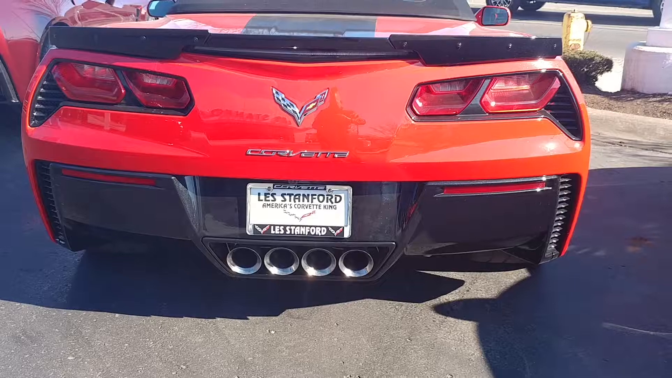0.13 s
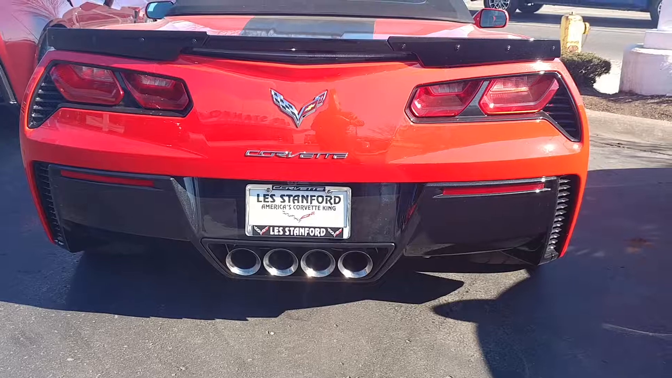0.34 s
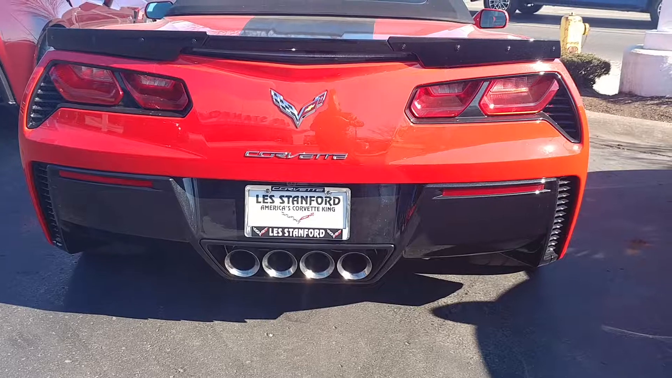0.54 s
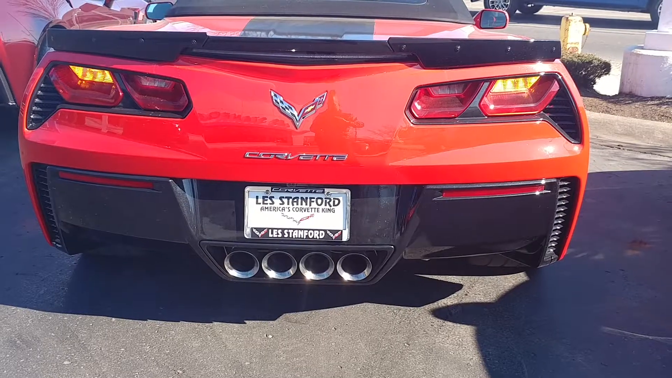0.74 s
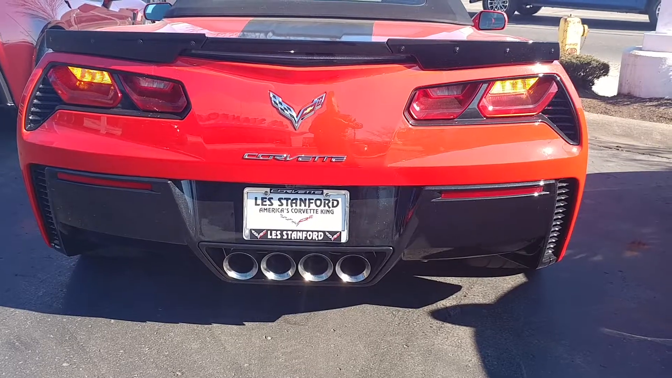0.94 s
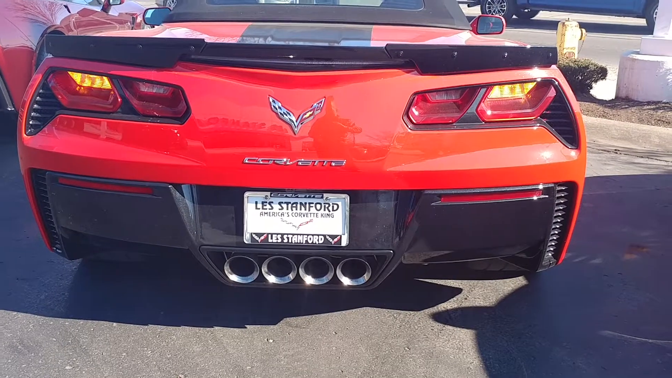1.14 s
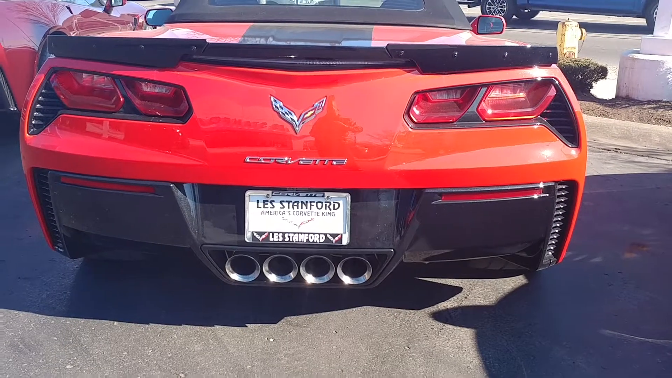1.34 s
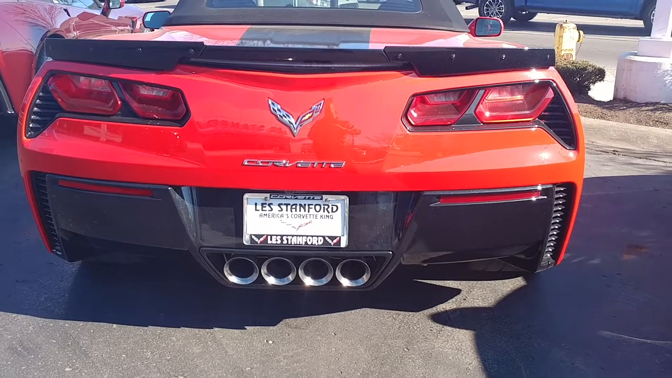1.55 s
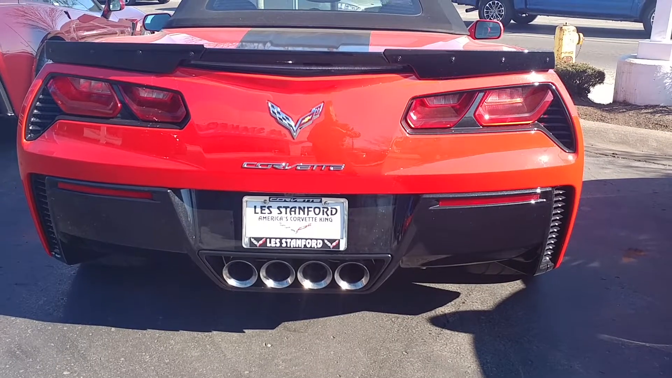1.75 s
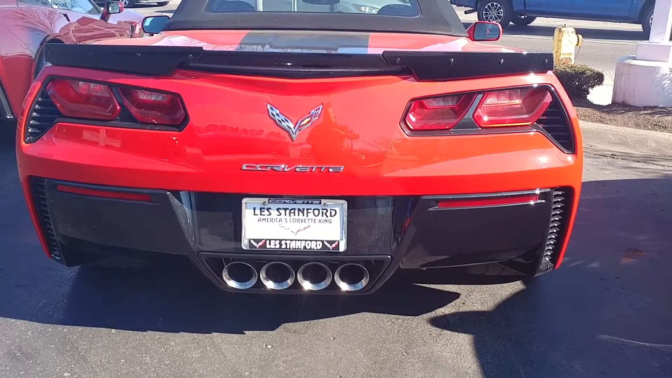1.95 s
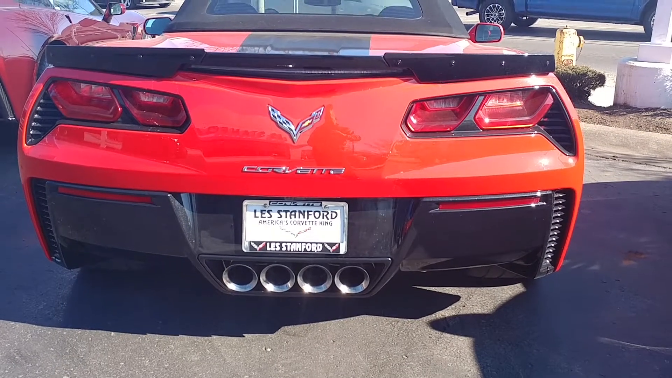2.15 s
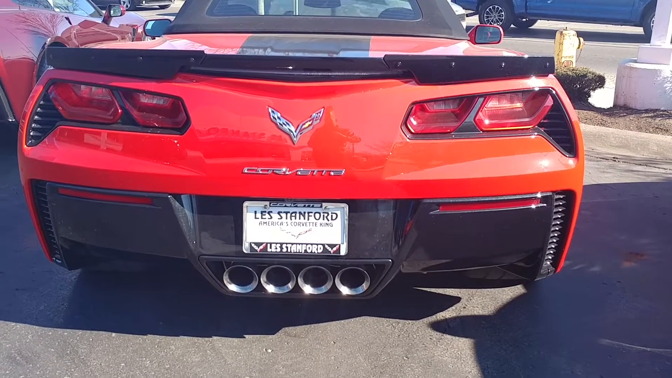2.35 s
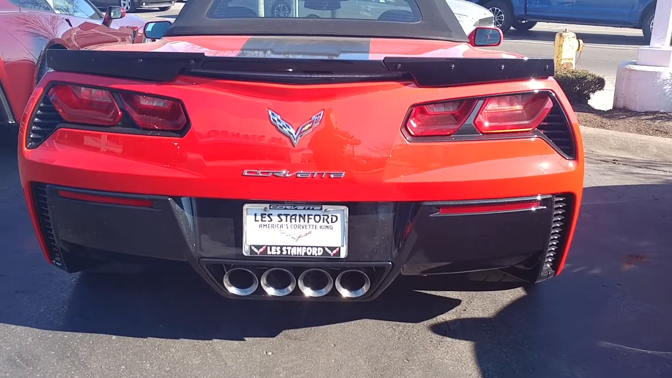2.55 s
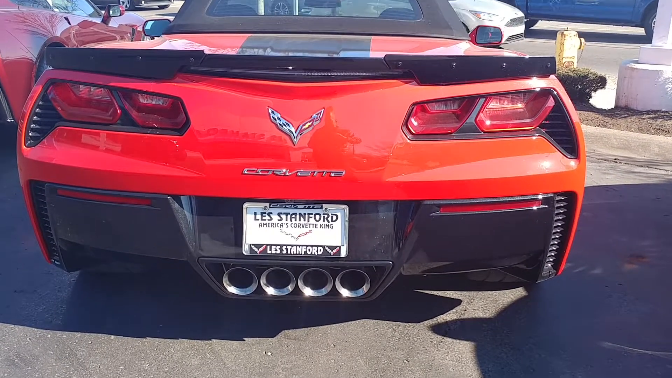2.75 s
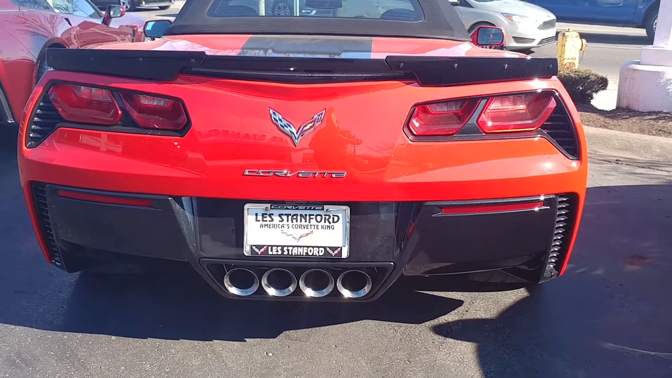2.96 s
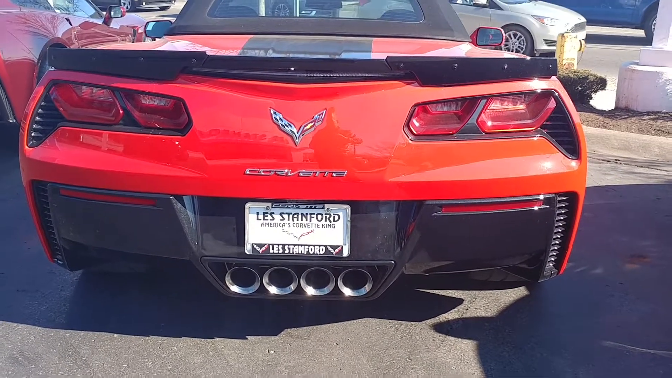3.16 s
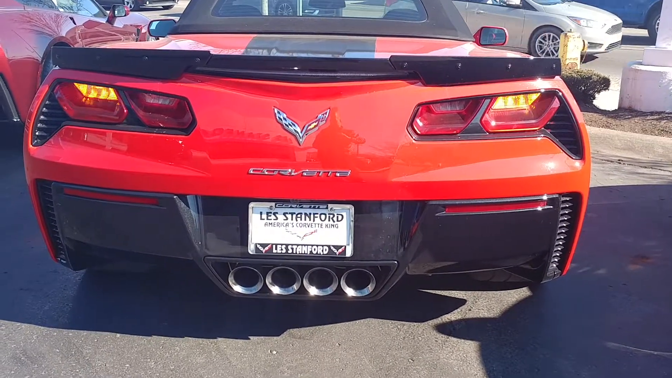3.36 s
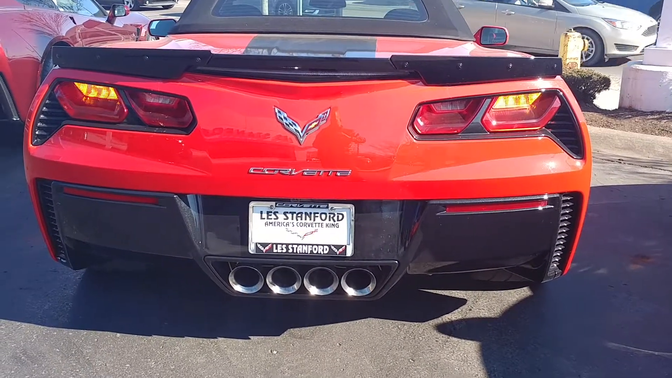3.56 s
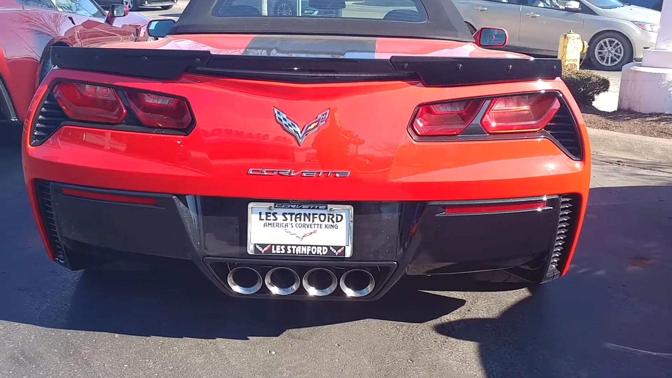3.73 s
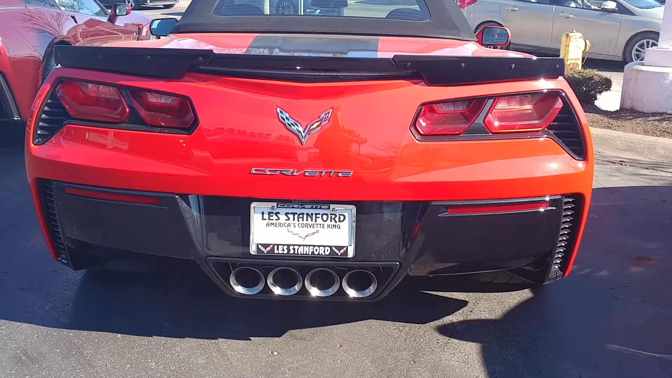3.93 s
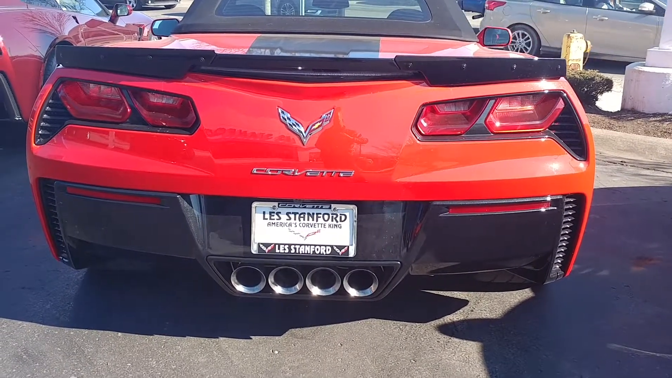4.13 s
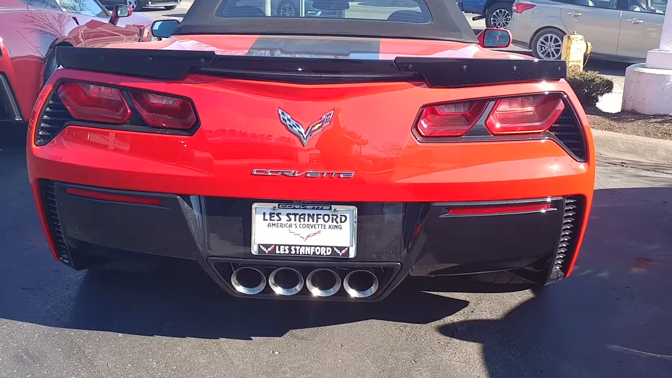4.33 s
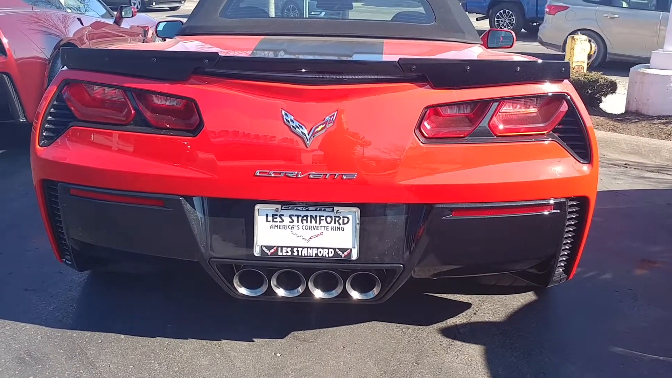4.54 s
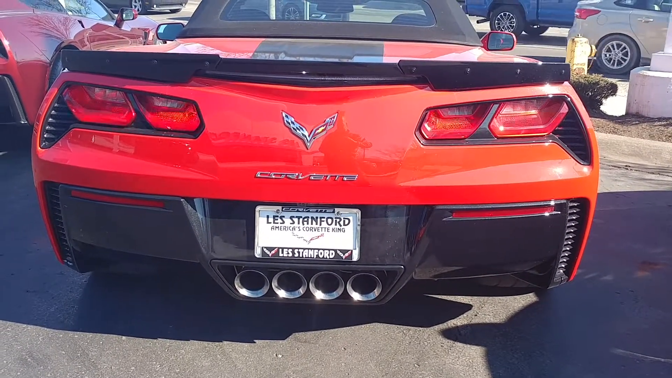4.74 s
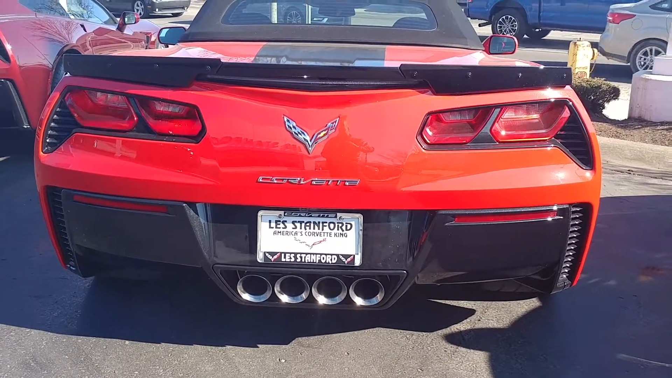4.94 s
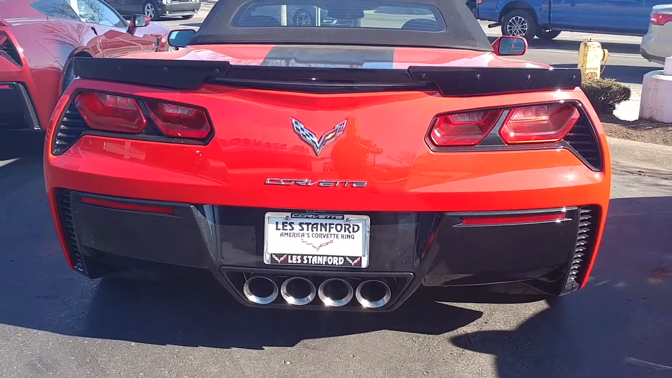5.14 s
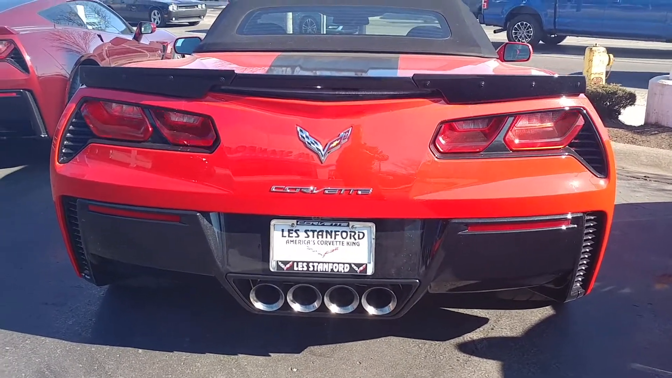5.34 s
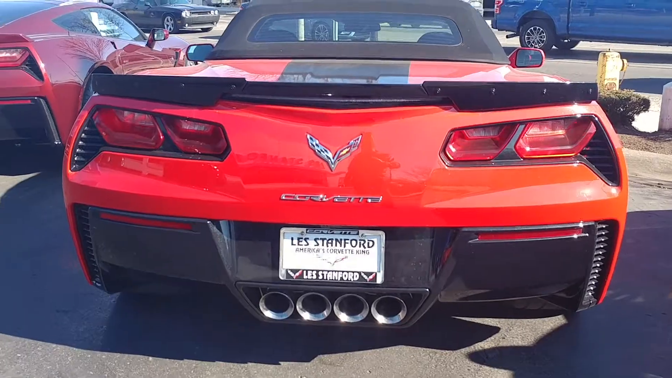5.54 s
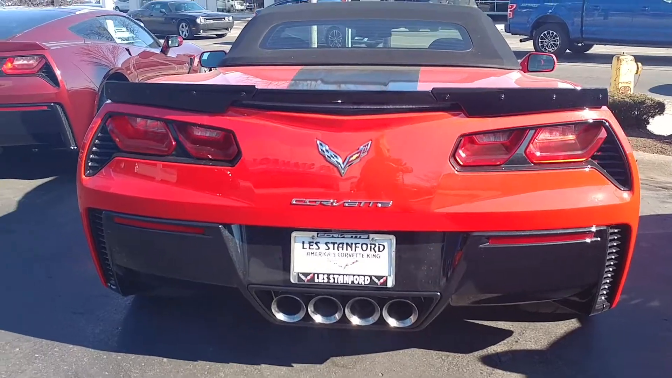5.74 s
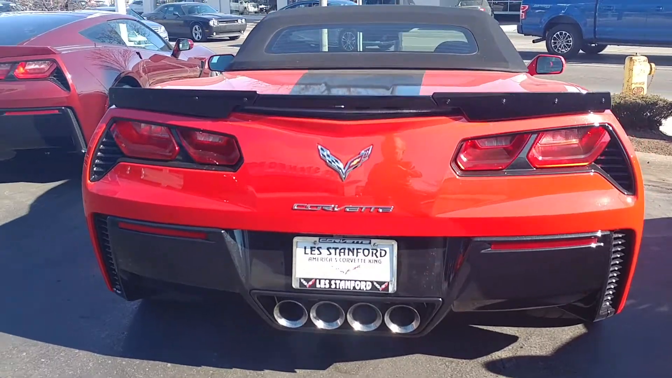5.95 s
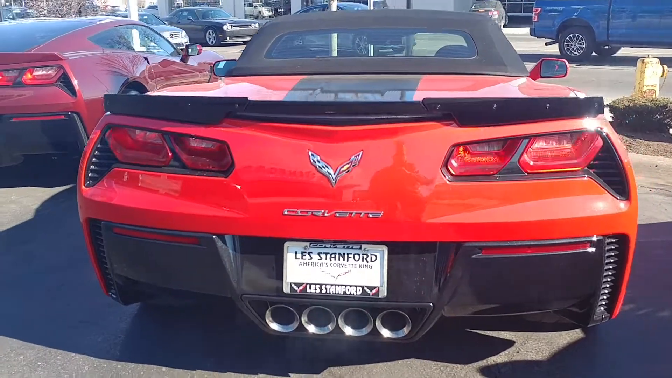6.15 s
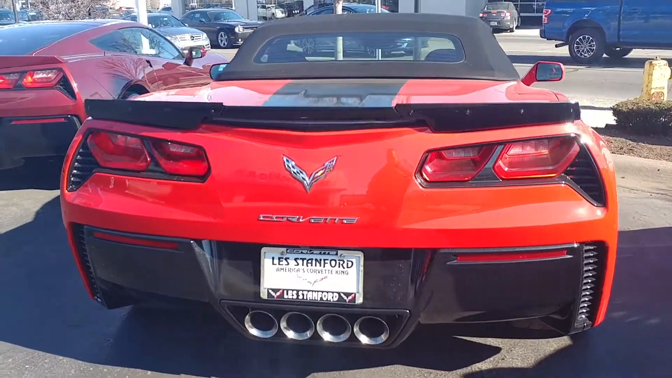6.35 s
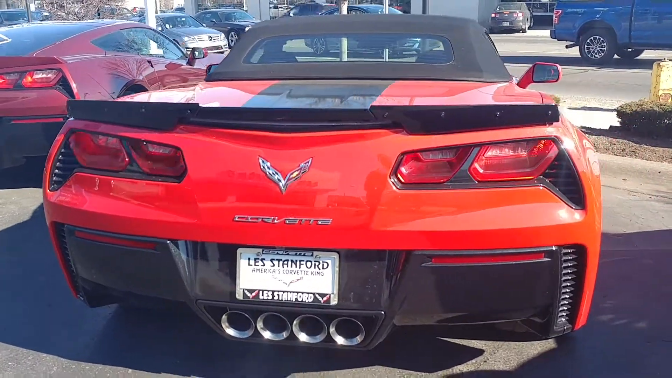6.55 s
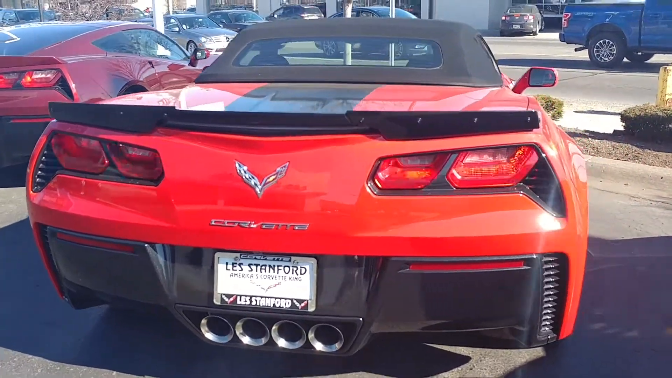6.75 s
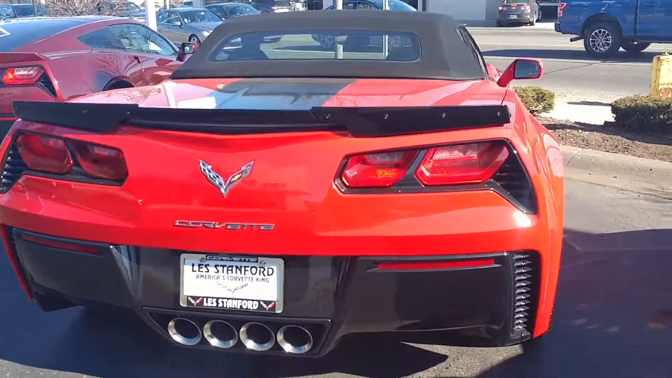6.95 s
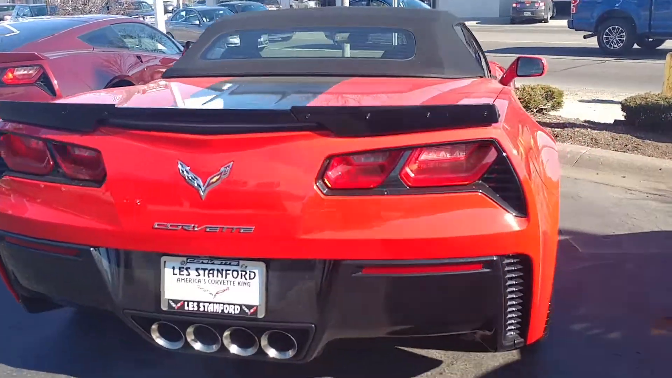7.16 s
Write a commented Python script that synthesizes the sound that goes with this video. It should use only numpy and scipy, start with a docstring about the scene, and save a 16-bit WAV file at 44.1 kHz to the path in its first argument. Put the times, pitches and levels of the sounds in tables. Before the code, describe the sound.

Low traffic rumble and road roar fill an open lot, with faint, even ticking and a few thin wisps of hiss. A plastic remote key clicks twice at about 0.6 and 0.7 seconds and again at 1.7. A dull bump follows at 2.6. Around 3.4 seconds a relay snaps softly and the fuel pump hisses faintly, with another snap and a thud at 3.7. From 3.9 the starter grinds with a wavering, rising whine and two clanks. At 4.5 seconds the big V8 catches with a loud bark, followed by a sharp pop. It holds a fast, loud cold idle, with thumping pulses, a booming muffler, ringing pipes and puffs of hiss, easing slightly in speed until the end at about 7.2 seconds. The microphone is just behind the tail pipes and overloads on the peaks.

```python
"""A big eight-cylinder engine starts by remote key in an open lot, heard from just behind its tail pipes.
Over rumbling traffic the key clicks, relays snap, the fuel pump primes and the starter grinds and whines
against the compressions. The engine catches with a bark and holds a fast, loud cold idle: each firing
thumps, rings the muffler and pipes and puffs out hiss. The peaks overload a two-port microphone."""
import sys
import numpy as np
from scipy import signal
from scipy.fft import rfft, irfft, next_fast_len
from scipy.io import wavfile
from scipy.ndimage import uniform_filter1d

SR = 44100
rng = np.random.default_rng(int(sys.argv[2]) if len(sys.argv) > 2 else 0)


def bounce(signal):
    """Save signal as a 16-bit WAV file at the path given by the first command-line argument."""
    frames = np.transpose(np.atleast_2d(signal))
    limited = np.clip(frames, -1, 1)
    pcm = np.round(limited * 32767).astype(np.int16)
    wavfile.write(sys.argv[1], SR, pcm)


N = 317079
T = np.arange(N) / SR
CATCH_S, CYCLE_S = 4.527, 4.5374  # the engine catches; its first firing cycle starts

# engine speed: time_s, firing_rate_hz
FIRING_RATE = [(4.53, 43.5), (4.58, 58.7), (4.7, 91.5), (5.1, 91.), (5.4, 88.9), (6.1, 88.6), (6.3, 84.7),
               (6.85, 82.6), (7.19, 82.6)]
# how alike the two ports hear the car: freq_hz, correlation
NEAR_CORRELATION = [(60, 0.96), (180, 0.97), (550, 1), (1650, -0.22), (4970, -0.18), (15000, -0.15)]


def amp(db):
    """Decibels to gain."""
    return 10 ** (np.asarray(db) / 20)


def unit_rms(x):
    """Scales to rms 1 between the first and the last sounding sample."""
    sounding = np.flatnonzero(abs(x).reshape(-1, N).sum(0) > 1e-7)
    return x / np.sqrt(np.mean(x[..., sounding[0]:sounding[-1]] ** 2))


def at_freq(points, hz):
    """Reads a spectrum table on a log-frequency axis."""
    freq_hz, value = np.transpose(points)
    return np.interp(np.log(hz + 1), np.log(freq_hz + 1), value)


def between(start_s, stop_s):
    """A soft-edged gate."""
    return uniform_filter1d(1. * ((T > start_s) & (T < stop_s)), size=100)


def resonate(x, hz, width_hz):
    """A resonance of gain 1 that can follow a moving pitch."""
    turn = np.exp(2j * np.pi * np.cumsum(hz * np.ones(N)) / SR)
    pole = np.exp(-np.pi * width_hz / SR)
    return 2 * (turn * signal.lfilter([1 - pole], [1, -pole], x / turn + 1e-18)).real


def ring(x, modes):
    """Fixed modes, all driven in step."""
    return sum(amp(db) * resonate(x, hz, width) for hz, width, db in modes)


def band_noise(hz, width_hz, shape=(2, N)):
    """Noise through the same resonance twice, at rms 1."""
    return unit_rms(resonate(resonate(rng.standard_normal(shape), hz, width_hz), hz, width_hz))


def burst(start_s, gain_db, hz, width_hz, rise_s, t60_s):
    """Band noise with a quick attack and a dying tail."""
    since = np.maximum(T - start_s, 0)
    return (1 - np.exp(-since / rise_s)) * amp(gain_db - 60 * since / t60_s) * band_noise(hz, width_hz)


def patchy_noise(spectrum, correlation, patchy_db, size):
    """Coloured stereo noise at rms 1 whose bands swell and fade at random."""
    frames, hz = 4 * N // size + 5, np.fft.rfftfreq(size, 1 / SR)
    a, b, c, d, patches = rng.standard_normal((frames, len(hz), 5)).T
    patches = uniform_filter1d(uniform_filter1d(patches, size=8, axis=0), size=8, axis=1)
    alike = np.clip(at_freq(correlation, hz), -1, 1)[:, None]
    left = a + 1j * b
    bins = np.array([left, alike * left + np.sqrt(1 - alike ** 2) * (c + 1j * d)])
    inside = (hz > .7 * spectrum[0][0]) & (hz < 1.3 * spectrum[-1][0])
    bins *= inside[:, None] * amp(at_freq(spectrum, hz)[:, None] + patchy_db * patches / patches.std())
    return unit_rms(signal.istft(bins, nperseg=size, noverlap=3 * size // 4)[1][:, :N])


def traffic():
    """A bed of lumpy rumble, road roar and wavering hums, from a road on the left."""
    # colours of the rumble and the roar: freq_hz, relative_db
    rumble_colour = [(15, -37), (25, -2.5), (37, -5.5), (54, 0), (75, -3), (102, 1), (135, -18),
                     (170, -11.5), (220, -26), (370, -120)]
    roar_colour = [(88, -30), (150, -21.5), (193, -1), (360, -10), (521, -5.5), (753, -17.5), (970, -15.5),
                   (1230, -27.5), (2420, -29), (3180, -45), (6520, -51), (8900, -46), (12400, -66),
                   (13400, -89), (15600, -99)]
    # swells of the rumble: time_s, level_db
    swells = [(.105, -28.5), (.9, -24.5), (1.35, -28.5), (1.95, -26.5), (2.05, -21), (3.45, -21),
              (3.6, -28), (4.6, -25.5)]
    # nearby hums: pitch_hz, width_hz, relative_db
    hum_bands = [(53.4, 22, -29.5), (194.9, 10.6, -36.5), (506.6, 12, -41.5), (570.7, 21, -42)]
    # how alike the two ports hear the road: freq_hz, correlation
    far_correlation = [(60, 0.72), (180, 0.91), (550, 0.82), (1650, -0.47), (4970, -0.15), (15000, 1)]
    rumble = patchy_noise(rumble_colour, far_correlation, patchy_db=-1.5, size=2048)
    roar = patchy_noise(roar_colour, far_correlation, patchy_db=1.84, size=1024)
    hums = sum(amp(db + 34) * band_noise(hz, width, shape=N) for hz, width, db in hum_bands)
    rumble_db = np.interp(T, *np.transpose(swells))
    roar_db = -33.5 + 2 * np.clip((T - 3.4) / .024, 0, 1)  # steps up when the car wakes
    fade = between(swells[0][0], swells[-1][0]) * amp(np.interp(T, [.089, .33], [-21.5, 0]))
    left, right = fade * (amp(rumble_db) * rumble + amp(roar_db) * (roar + hums))
    return np.array([left, np.roll(right, 11)])  # the road reaches the right port later


def ticking():
    """Faint, evenly spaced ticks and a few louder ones of the same colour."""
    # louder ticks: start_s, gain_db
    accents = [(.883, -36), (1.69, -37), (3.06, -45)]
    steady = [(.2595 + .1555 * k, -48 + 2.5 * rng.standard_normal()) for k in range(24)]
    return sum(burst(s, db, hz=1750, width_hz=990, rise_s=.0047, t60_s=.14) for s, db in steady + accents)


def hisses():
    """Short, thin wisps of treble."""
    # wisps: start_s, gain_db, t60_s
    wisps = [(.5, -52, 0.47), (.57, -41, 0.22), (1.02, -51, .2), (1.64, -48, 0.17), (2.47, -47, 0.16)]
    return sum(burst(s, db, hz=8000, width_hz=3600, rise_s=.022, t60_s=t60) for s, db, t60 in wisps)


def remote_key():
    """A plastic button snaps, ringing very short modes, and rasps after each click."""
    # button clicks: start_s, peak_db, left_minus_right_db
    clicks = [(0.623, -13.5, 6.5), (0.7463, -13.5, 2.5), (1.6647, -13, 12)]
    # modes of the plastic: pitch_hz, width_hz, relative_db
    modes = [(4090, 230, 2), (5650, 670, -4), (8650, 420, 9.5), (12600, 1000, -13), (14400, 1200, -11)]
    snaps = np.zeros((2, N))
    for s, db, pan_db in clicks:
        snaps[:, round(s * SR)] = amp([db + pan_db / 2, db - pan_db / 2])
    peak = abs(ring(signal.unit_impulse(N), modes)).max()
    rasp = sum(burst(s + .008, -43, hz=8500, width_hz=5000, rise_s=.0035, t60_s=.085) for s, *_ in clicks)
    return ring(snaps, modes) / peak + rasp


def relays():
    """Relays and latches snap inside the car."""
    # snaps: start_s, gain_db, centre_hz, width_hz
    snaps = [(3.41, -41.5, 7500, 8000), (3.707, -41.5, 4740, 5000)]
    return sum(burst(*snap, rise_s=.0027, t60_s=.25) for snap in snaps)


def thuds():
    """Two low, dull bumps."""
    # bumps: start_s, gain_db, centre_hz, rise_s, t60_s
    bumps = [(2.63, -17, 192, 0.013, 0.32), (3.716, -20, 398, 0.0034, 0.2)]
    return sum(burst(s, db, hz, .86 * hz, rise, t60) for s, db, hz, rise, t60 in bumps)


def fuel_pump():
    """The pump primes with a thin hiss that swells, holds and stops."""
    # hiss bands: centre_hz, width_hz, level_db
    bands = [(9200, 1000, -58), (12200, 3500, -61)]
    swell = uniform_filter1d(between(3.41, 3.64), size=round(.07 * SR))
    return swell * sum(amp(db) * band_noise(hz, width) for hz, width, db in bands)


def clanks_and_pop():
    """Two clanks during cranking, then a sharp pop just after the engine catches."""
    # hits: start_s, gain_db, width_hz, t60_s
    hits = [(4.29, -26, 6100, .4), (4.43, -26.5, 8000, 0.56), (4.718, -14, 1810, 0.13)]
    return sum(burst(s, db, hz=2600, width_hz=w, rise_s=.0018, t60_s=t60) for s, db, w, t60 in hits)


def starter(engage_s=3.9, release_s=4.55):
    """The pinion slams in and grinds on the ring gear; the motor's whine sags on each compression."""
    # turning points of the whine: time_s, pitch_hz
    turns = [(3.919, 4270), (4.091, 6900), (4.199, 4430), (4.304, 8740), (4.355, 6500), (4.455, 9800),
             (4.55, 9200)]
    # partials of the whine: pitch_ratio, relative_db
    partials = [(.5, -5), (.62, -9), (1, 0), (1.38, -9)]
    # colour of the gear grind: freq_hz, relative_db
    grind_colour = [(350, -43), (600, -9), (746, -10.5), (1320, -3.5), (1520, -9.5), (3090, -19.5),
                    (4650, -14), (6720, -20.5), (9190, -14.5), (10700, -29), (15600, -40)]
    turn_s, turn_hz = np.transpose(turns)
    step = np.interp(T, turn_s, np.arange(len(turns)))
    eased = np.floor(step) + .5 - .5 * np.cos(np.pi * (step % 1))  # the heavy rotor changes speed smoothly
    hz = np.interp(eased, np.arange(len(turns)), turn_hz)
    whine = sum(amp(db) * unit_rms(resonate(rng.standard_normal((2, N)), ratio * hz, width_hz=140))
                for ratio, db in partials)
    whine_db = -38.5 - 5 * np.maximum(hz - 7200, 0) / 1000  # thins out once the motor races
    since = np.maximum(T - engage_s, 0)
    slam_db = 14.5 * np.exp(-np.maximum(since - .038, 0) / .012)
    grind = patchy_noise(grind_colour, NEAR_CORRELATION, patchy_db=2.5, size=256)
    on = between(engage_s, release_s) * np.minimum(since / .012, 1) ** 2
    return on * (amp(whine_db) * whine + amp(slam_db - 33) * grind)


def impulses(count, marks, sizes):
    """One impulse as the firing count passes each mark; marks it jumps over stay silent."""
    out, place = np.zeros(N), np.minimum(np.searchsorted(count, marks), N - 1)
    np.add.at(out, place, sizes * (count[place] - marks < .01))
    return out


def exhaust_thump(kicks):
    """Pressure falls fast at each shock front, stays low a third of a firing and refills slowly."""
    t = np.arange(900) / SR
    front = np.sin(np.pi / 2 * np.clip(t / .0013, 0, 1)) ** 2
    refill = .53 / (1 + np.exp((t - .0037) / .0004)) + .4 * np.exp(-t / .01)
    pressure = signal.oaconvolve(kicks, -front * refill)[:N]
    return signal.sosfiltfilt(signal.butter(2, 50, "high", fs=SR, output="sos"), pressure)


def muffler_boom(pushes, flow):
    """Firings and gas flow set the muffler's chambers booming."""
    # chambers: pitch_hz, width_hz, relative_db
    chambers = [(51, 7.9, 6), (63.6, 30, -9), (116, 32, -9), (204.6, 16.7, -0.5), (291.7, 8.5, 3.9)]
    boom = ring(unit_rms(pushes) + .2 * flow.sum(0) + .25 * flow, chambers)
    return signal.sosfilt(signal.butter(3, 600, fs=SR, output="sos"), boom)


def header_knock(cracks, active_cylinder):
    """Each cylinder has its own header length, so its crack gets its own pattern of reflections."""
    lag_s = np.arange(600) / SR
    echoes = rng.choice([-1., 1.], (8, 600)) * (rng.random((8, 600)) < .03) * amp(-5 - 60 * lag_s / .06)
    echoes[:, 0] = 1
    echoes /= np.linalg.norm(echoes, axis=1, keepdims=True)
    return sum(signal.oaconvolve(cracks * (active_cylinder == k), echoes[k])[:N] for k in range(8))


def pipe_ring(knock, flow, bark_hz=1280, bark_width_hz=390):
    """Knock and flow ring the tail pipes; the open throttle makes the upper modes bark after the catch."""
    # tail pipe modes: pitch_hz, width_hz, relative_db
    modes = [(506.1, 23.5, 5), (704, 71, -5), (814, 65, -2), (907, 77, -4), (1120, 37, -13),
             (1228, 62, -10.5), (1324, 57, -13), (1881, 160, -13.), (2144, 48, -7)]
    pipe = ring(unit_rms(knock) + .26 * flow.sum(0) + .3 * flow, modes)
    bark = resonate(resonate(pipe, bark_hz, bark_width_hz), bark_hz, bark_width_hz)
    swell = np.maximum(T - CATCH_S, 0) / .15
    pipe += amp(4) * swell * np.exp(1 - swell) * bark
    return signal.sosfilt(signal.butter(7, 2300, fs=SR, output="sos"), pipe)  # packing soaks up the treble


def jet_hiss(spurts, on):
    """The gas jet hisses steadily, with a bright puff on each firing; the first ones spit harder."""
    # colours of the puffs and the steady jet: freq_hz, relative_db
    puff_colour = [(2500, -16), (5000, -13), (7500, -13), (9400, 2), (10600, -11), (11800, -3),
                   (14000, -10), (15600, -12)]
    jet_colour = [(1410, -35), (2400, -38.5), (2580, -11), (3260, 3.5), (4030, -7), (4390, -3), (5640, -4),
                  (6920, -7), (7970, -5), (9250, 4), (9850, 0.5), (10700, -15), (11800, -0.5), (14000, -14),
                  (15600, -25)]
    # how alike the two ports hear the puffs: freq_hz, correlation
    puff_correlation = [(3000, .5), (9000, .8), (15000, .8)]
    gate = signal.oaconvolve(spurts, signal.windows.hann(round(.007 * SR)) ** 1.5)[:N]
    puffs = unit_rms(on * gate * patchy_noise(puff_colour, puff_correlation, patchy_db=1.2, size=256))
    jet = patchy_noise(jet_colour, NEAR_CORRELATION, patchy_db=1.4, size=256)
    spit_db = 4 * np.exp(-np.maximum(T - CATCH_S, 0) / .14)
    return amp(spit_db - 2) * puffs + amp(-5) * jet


def exhaust_gains(rate_hz):
    """The exhaust's balance shifts at the catch, dips in one stumble and drifts as the idle sags."""
    # thump, boom, pipe, hiss: idle_db, sag_db_per_hz, flare_db, flare_decay_s, bang_db, stumble_db
    layers = [(-14, 0.44, 4.5, 0.099, -6, -11), (-14.5, -0.58, -18, 0.047, -2, -5),
              (-15.5, 0.0248, 4, 0.94, -1, -3), (-32.5, 0.53, 16.5, 0.68, 9, -5)]
    since = np.maximum(T - CATCH_S, 0)
    sag_hz = np.maximum.accumulate(rate_hz) - rate_hz
    attack = np.clip(since / .007, .3, 1)
    bang = np.exp(-since / .03)
    stumble = np.exp(-.5 * ((T - 4.742) / .016) ** 2)
    return [attack * amp(idle + slope * sag_hz + flare * np.exp(-since / decay) + hit * bang + dip * stumble)
            for idle, slope, flare, decay, hit, dip in layers]


def engine(splice_s=5.472, splice_firings=2.1):
    """Eight uneven cylinders fire in turn; each sends out a thump, a boom, a crack and a puff."""
    # cylinders in firing order: late_firings, thump_db
    cylinders = [(-.03, .8), (-.07, .2), (.04, -2.3), (.015, 1.9), (-.03, .8), (-.04, -.4), (-.015, -3.4),
                 (-.01, 1.2)]
    # tone of the same cylinders: crack_db, puff_db, muffler_push
    voices = [(-1, -4, .3), (1.5, -3, -.9), (-2, 1.5, -.3), (-.3, 3, .9), (1, -1.6, .3), (-1.5, .3, -.9),
              (-2.5, 3.5, -.3), (1.2, -.4, .9)]
    # muffler side chambers that lift or cancel a band: centre_hz, width_hz, share_added
    side_chambers = [(263, 34, 0.59), (352.5, 55, -0.66), (1540, 122, -0.83), (2440, 240, -0.63)]
    on = between(CATCH_S, np.inf)
    rate_hz = np.interp(T, *np.transpose(FIRING_RATE))
    count = np.cumsum(rate_hz) / SR  # running count of firings
    count -= count[round(CYCLE_S * SR)]
    count += splice_firings * (T > splice_s)  # the sound jumps ahead about two firings, like a tiny splice
    firing = np.arange(-1, int(count[-1]))
    cylinder = firing % 8
    late, thump_db = np.array(cylinders)[cylinder].T
    crack_db, puff_db, push = np.array(voices)[cylinder].T
    marks = firing + late
    active_cylinder = cylinder[np.clip(np.searchsorted(marks, count) - 1, 0, len(marks) - 1)]
    jitter, thump_luck, gas_luck, crack_luck = rng.standard_normal((len(firing), 4)).T
    kicks = impulses(count, marks + .3 + .01 * jitter, amp(thump_db + .8 * thump_luck))
    pushes = impulses(count, marks + .3, push + .15 * gas_luck)
    cracks = impulses(count, marks + .27 + .006 * jitter, amp(crack_db + 2.4 * crack_luck))
    spurts = impulses(count, marks + .36, amp(puff_db + 1.3 * gas_luck))
    flow = rng.standard_normal((2, N))
    thump_gain, boom_gain, pipe_gain, hiss_gain = exhaust_gains(rate_hz)
    thump = thump_gain * unit_rms(on * exhaust_thump(kicks))
    boom = boom_gain * unit_rms(on * muffler_boom(on * pushes, flow))
    pipe = pipe_gain * unit_rms(on * pipe_ring(on * header_knock(cracks, active_cylinder), flow))
    body = thump + boom + pipe
    for hz, width, share in side_chambers:
        body += share * resonate(body, hz, width)
    return on * (body + hiss_gain * jet_hiss(spurts, on))


def scene():
    """Traffic, the engine and the small sounds around its start, all in the open air."""
    return (traffic() + engine() + remote_key() + ticking() + hisses() + relays() + thuds()
            + clanks_and_pop() + starter() + fuel_pump())


def record(dry):
    """Two ports differ in colour and the left hears earlier; deep bass and top are cut, peaks overload."""
    # balance of the ports: freq_hz, left_minus_right_db
    balance = [(60, 2.5), (130, -0.5), (290, 0.5), (640, 1.5), (1410, -4.5), (3100, -1), (6820, 1),
               (15000, -1.5)]
    size = next_fast_len(N + 2000)
    hz = np.fft.rfftfreq(size, 1 / SR)
    left = amp(at_freq(balance, hz) / 2) * np.exp(1j * np.pi * hz * 9e-5)
    bass_cut = 1 / np.sqrt(1 + (41 / (hz + 1e-3)) ** 8)
    self_noise = amp(-76) * rng.standard_normal((2, N)) * np.clip((T - .105) / .11, 0, 1)
    ports = irfft(rfft(dry + self_noise, size) * bass_cut * np.array([left, 1 / left]), size)[:, :N]
    clipped = ports / (1 + abs(ports) ** 8) ** (1 / 8)
    offset = .004 * (T > CYCLE_S)
    top_cut = signal.firwin(1023, 15800, window=("kaiser", 9), fs=SR)
    return signal.oaconvolve(clipped + offset, top_cut[None], "same")


dry = scene()
out = record(dry)
bounce(out)
```